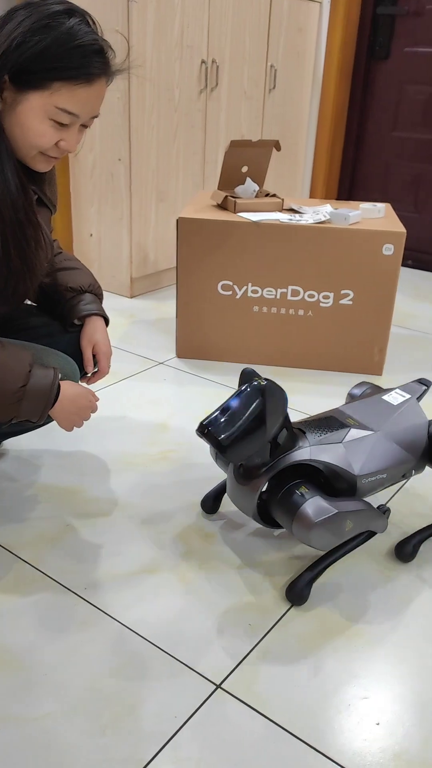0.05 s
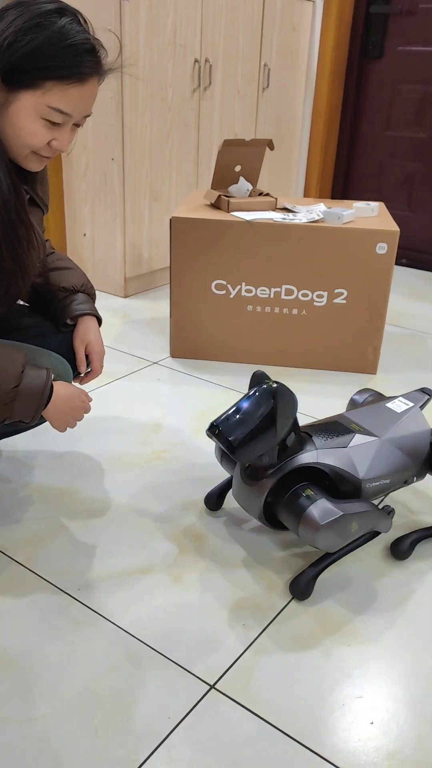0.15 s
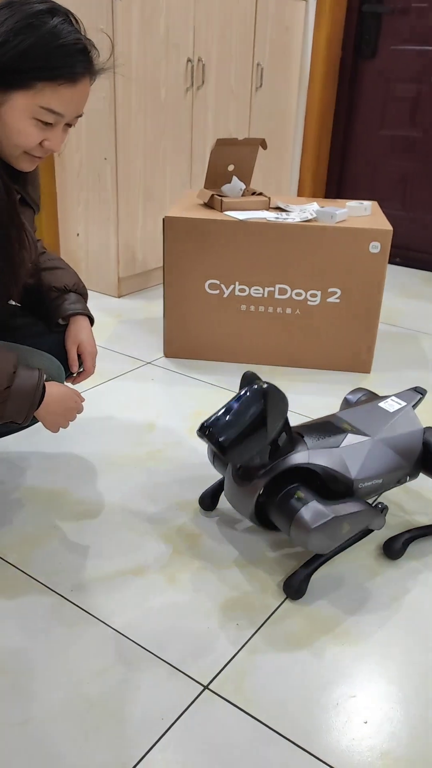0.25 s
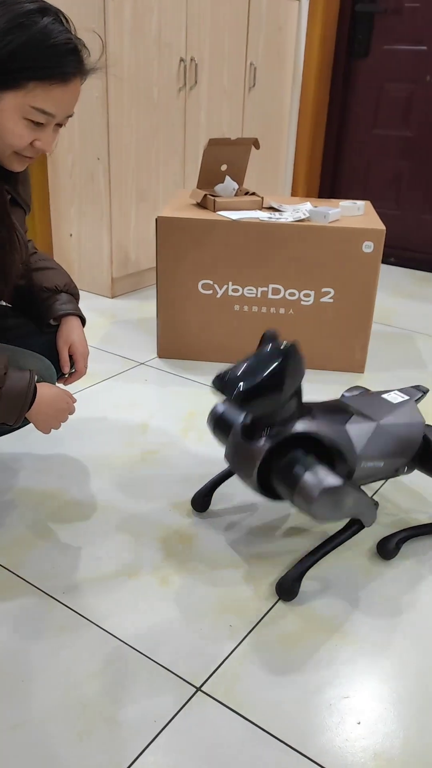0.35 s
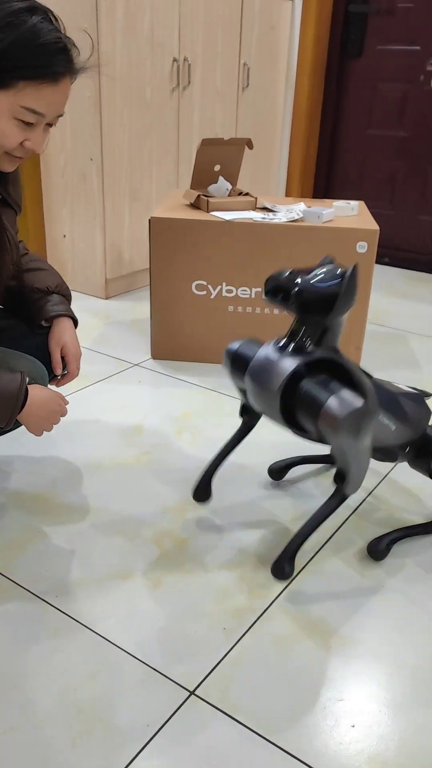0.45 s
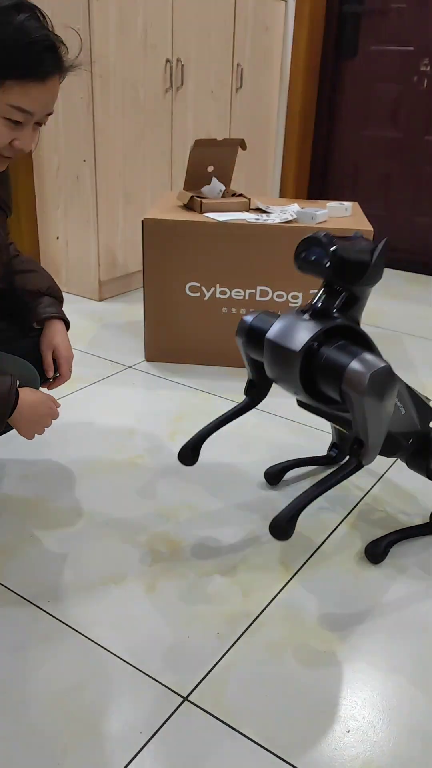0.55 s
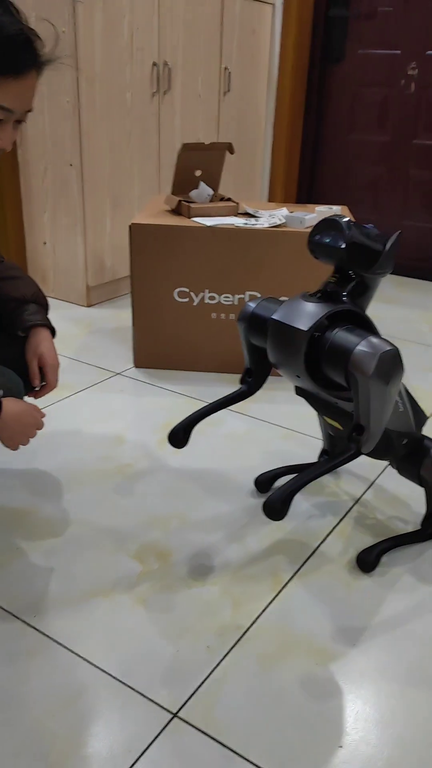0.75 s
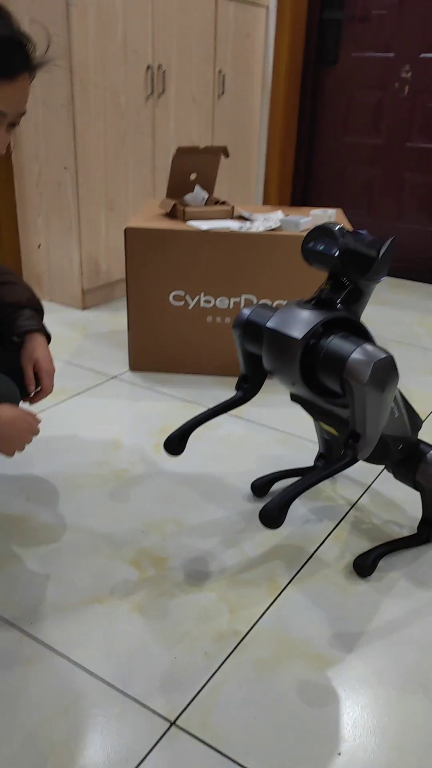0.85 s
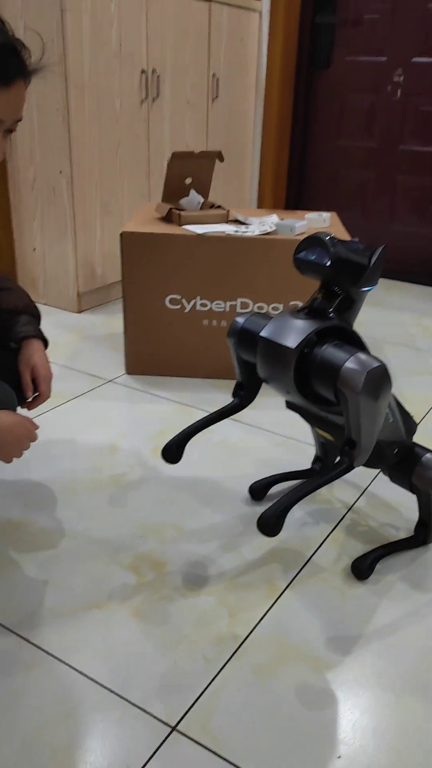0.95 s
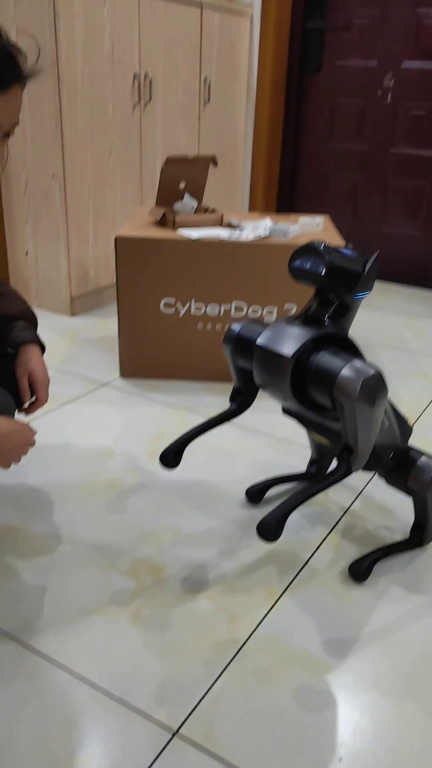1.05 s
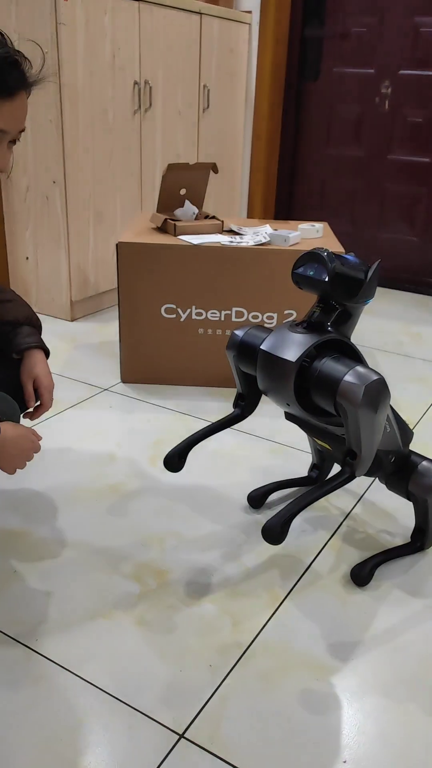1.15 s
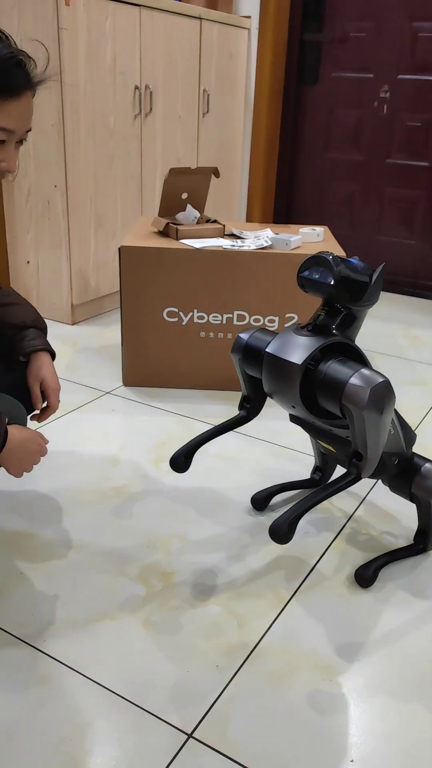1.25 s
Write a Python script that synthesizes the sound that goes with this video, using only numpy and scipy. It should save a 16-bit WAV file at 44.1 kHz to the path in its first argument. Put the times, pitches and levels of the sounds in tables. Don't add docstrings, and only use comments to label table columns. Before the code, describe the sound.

A small robot on four legs jerks up from a tiled floor with a loud thud and plastic clack, rattles, then whirrs briefly into a softer second knock, in a hard-walled room, phone about two metres away.

```python
import sys
import numpy as np
from scipy import signal
from scipy.io import wavfile
from scipy.ndimage import uniform_filter1d

SR = 44100
rng = np.random.default_rng(int(sys.argv[2]) if len(sys.argv) > 2 else 0)


def dump(signal):
    limited = np.clip(np.atleast_2d(signal).T, -1, 1)
    pcm = np.round(limited * 32767).astype(np.int16)
    wavfile.write(sys.argv[1], SR, pcm)


def convert_level_to_amplitude(level_db):
    exponent = np.asarray(level_db, float) / 20
    return 10 ** exponent


N = 57330
T = np.arange(N) / SR
CARRIER_HZ = 11950
WIDE_HZ = 753


def unit(x):
    return x / np.sqrt(np.mean(x ** 2))


def curve(rows, column=1):
    rows = np.array(rows, float)
    return np.interp(T, rows[:, 0], rows[:, column])


def band(x, hz, width):
    return signal.lfilter(*signal.iirpeak(min(hz, .45 * SR), hz / width, SR), x)


def ring(x, hz, t60):
    radius = np.exp(-np.log(1000) / (t60 * SR))
    angle = 2 * np.pi * hz / SR
    return signal.lfilter([0, np.sin(angle)], [1, -2 * radius * np.cos(angle), radius ** 2], x)


def butter(x, order, hz, kind):
    return signal.lfilter(*signal.butter(order, hz, kind, fs=SR), x)


def walk(rate):
    k = int(SR / rate)
    return unit(uniform_filter1d(uniform_filter1d(rng.standard_normal(N), k), k))


def thuds():
    # (time [s], level [dB], ring [Hz], t60 [s])
    landings = [(.243, -14, 890, 0.022), (.25, -29.5, 285, 0.095), (.261, -5.5, 383, 0.041),
                (0.2773, -15, 255.2, 0.12), (0.282, -16.5, 464, .08), (0.2951, -12.5, 250.3, 0.088),
                (0.2994, -15.5, 414, 0.072), (0.303, -25, 270, 0.035), (0.306, -29, 127, 0.19),
                (0.32, -27, 290, 0.3), (0.353, -22.5, 222, 0.033), (0.399, -28.5, 370, 0.078),
                (0.512, -41, 290, 0.3), (.564, -19.5, 746, 0.036), (0.573, -20, 360, 0.11),
                (.584, -26, 290, 0.096), (.594, -20, 357, .05), (.59, -30, 208, 0.23),
                (0.566, -23, 159, 0.092), (.64, -43.5, 168.7, 0.19), (0.657, -45.5, 316, 0.11),
                (.72, -50, 208, 0.048), (0.9767, -37, 1600, 0.011), (.977, -43.5, 388.4, 0.11),
                (0.986, -38, 227, 0.1), (0.995, -39, 301, 0.06), (1.014, -36.5, 222, 0.028),
                (1.039, -41, 358.6, 0.13), (1.062, -37, 220.5, 0.053), (1.086, -50, 360, 0.071)]
    out = np.zeros(N)
    for start, db, hz, t60 in landings:
        age = np.maximum(T - start, 0)
        onset = 1 - np.exp(-age * hz / .4)
        out += convert_level_to_amplitude(db - 60 * age / t60) * onset * np.sin(2 * np.pi * hz * age)
    return butter(out, 2, 110, "high")


def slab_boom():
    # (time [s], level [dB])
    blows = [
        (0.249, -27),
        (.55, -47),
        (0.699, -59),
        (.92, -70),
    ]
    slab_hz, t60_s, rise_s = 59.8, 1.08, 0.058
    level = 0
    for start, db in blows:
        age = np.maximum(T - start, 0)
        level = level + convert_level_to_amplitude(db - 60 * age / t60_s) * (1 - np.exp(-(age / rise_s) ** 2))
    wobble = convert_level_to_amplitude(2.2 * walk(18))
    return level * wobble * np.sin(2 * np.pi * slab_hz * T + walk(2.2))


def clacks():
    # (time [s], level [dB], contact [ms])
    stops = [
        (0.243, -24.5, 0.029),
        (.245, -15, 0.058),
        (.26, -23.5, 0.034),
        (.27, -26.5, 0.04),
        (.297, -31, 0.11),
        (.321, -19, 0.386),
        (.478, -51, 0.07),
        (.566, -64, .04),
        (.976, -51, 0.13),
    ]
    push = np.zeros(N)
    for start, db, ms in stops:
        push += convert_level_to_amplitude(db) * np.exp(-.5 * ((T - start) * 1000 / (0.18 * ms)) ** 2) * 0.031 / ms
    return push


def rattle():
    # (time [s], level [dB])
    chatter_level = [(.222, -86), (.239, -39), (.243, -19.5), (.28, -27), (.34, -36), (.42, -50),
                     (.54, -51), (.562, -38), (.59, -36.5), (.63, -45.5), (.7, -67), (.97, -77.5),
                     (.98, -57), (1.06, -69), (1.13, -67.5)]
    ticks_per_s, spread_db = 4000, 2.5
    happens = rng.random(N) < ticks_per_s / SR
    strength = convert_level_to_amplitude(spread_db * rng.exponential(size=N))
    ticks = happens * strength * rng.choice([-1, 1], N)
    return 0.16 * unit(ticks) * convert_level_to_amplitude(curve(chatter_level))


def shell(push, chatter):
    # (frequency [Hz], level [dB], t60 [s])
    shell_modes = [(691, -14.5, 0.037), (846, -6.5, 0.012), (1380, -11, 0.005), (1600, -6, 0.019),
                   (1840, -10.5, 0.011), (2243, -8, 0.014), (2402, -7, 0.02), (2618, -5, 0.016),
                   (3020, -8.5, 0.0091), (3720, -2, 0.0042), (4520, -3, 0.003), (5280, -4.5, 0.0028),
                   (6500, -10, 0.0013), (10650, -2, 0.00099)]
    # (time [s], treble crack [dB])
    hardness_curve = [
        (.22, 0),
        (.33, 0),
        (.4, -12),
        (.45, -20),
        (.54, -10),
        (.562, 5),
        (.585, -4),
        (.62, -10),
        (.66, -20),
        (1.3, -24),
    ]
    hardness = curve(hardness_curve)
    crack = convert_level_to_amplitude(-5) * butter(push + chatter * convert_level_to_amplitude(hardness), 2, 5000, "high")
    contact = butter(push + chatter, 2, [400, 7500], "band")
    firm = contact * convert_level_to_amplitude(.5 * hardness)
    modes = np.array([convert_level_to_amplitude(db) * ring(contact if hz < 4300 else firm, hz, t60)
                      for hz, db, t60 in shell_modes])
    sign = (-1.) ** np.arange(len(shell_modes))
    return modes.sum(0) + crack, convert_level_to_amplitude(2.0) * sign @ modes + convert_level_to_amplitude(-4) * np.roll(crack, 9)


def chassis(chatter):
    # (frequency [Hz], level [dB], t60 [s])
    chassis_modes = [(207.8, -4, 0.054), (290, 0, 0.11), (360, 4, .05), (453, -3, 0.099)]
    drum = sum(convert_level_to_amplitude(db) * ring(band(chatter, hz, hz), hz, t60) for hz, db, t60 in chassis_modes)
    return convert_level_to_amplitude(-10) * drum


def gears(speed):
    # (frequency [Hz], width [Hz], level [dB], power of speed [-])
    housing = [(1600, 310, 0.5, 1.5), (2030, 310, -2, 0), (2853, 310, 5.5, 4), (3500, 600, -3.5, 1.5),
               (5370, 1100, -12, 0), (8500, 560, -28.5, 0.5)]
    grit = rng.standard_normal(N) * convert_level_to_amplitude(2.2 * walk(400))
    out = 0
    for hz, width, db, power in housing:
        whirr = band(band(band(grit, hz, width), hz, 2 * width), hz, 3 * width)
        out = out + convert_level_to_amplitude(db) * (speed / 377.0) ** power * unit(whirr)
    return out


def whistle(speed):
    # (multiple of speed [-], level [dB])
    sidebands = [(-3, 2), (-1, -1), (1, -2.5), (3, -2.5), (5, -9.5)]
    jitter_rad = 2.3
    turn = 2 * np.pi * np.cumsum(speed) / SR
    out = 0
    for multiple, db in sidebands:
        phase = 2 * np.pi * CARRIER_HZ * T + multiple * turn + jitter_rad * walk(150)
        out = out + convert_level_to_amplitude(db + 2.3 * walk(113.4)) * np.sin(phase)
    return convert_level_to_amplitude(-12.5) * out


def holding_tone():
    # (time [s], level [dB])
    hold_level = [(0, -83), (.2, -88), (.7, -90), (.85, -85), (.93, -97), (1.05, -97), (1.1, -77),
                  (1.3, -80)]
    return convert_level_to_amplitude(curve(hold_level) + 1.2 * walk(15)) * np.sin(2 * np.pi * (CARRIER_HZ + 5) * T)


def motors():
    # (time [s], electrical speed [Hz], effort [dB])
    run = [
        (.33, 11, -77),
        (.39, 30, -60),
        (.44, 90, -56),
        (.48, 170, -40),
        (.52, 288, -40.5),
        (.553, 343, -37.5),
        (.56, 370, -39.5),
        (.6, 240, -57),
        (.66, 250, -83.5),
    ]
    speed, effort = curve(run), convert_level_to_amplitude(curve(run, column=2))
    hold = holding_tone()
    mid = effort * (gears(speed) + whistle(speed)) + hold
    side = effort * whistle(speed) + 0.62 * hold
    return mid, side


def room(x):
    t60_s, treble_t60_s = 0.31, 0.14
    t = np.arange(SR) / SR
    noise = rng.standard_normal((2, SR)) * np.clip((t - .004) / 0.0043, 0, 1)
    low = butter(noise, 1, 2500, "low")
    tail = low * convert_level_to_amplitude(-60 * t / t60_s) + (noise - low) * convert_level_to_amplitude(-60 * t / treble_t60_s)
    tail = tail / np.sqrt(np.sum(tail[0] ** 2))
    mid, side = signal.fftconvolve(tail, x[None], axes=1)[:, :N]
    return mid, butter(side, 1, WIDE_HZ, "high")


def wide_noise(hz, width):
    shared = band(rng.standard_normal(N), hz, width)
    apart = band(rng.standard_normal(N), hz, width) * np.array([[1], [-1]])
    return shared + min(hz / WIDE_HZ, 1) * apart


def cooling_fan():
    # (frequency [Hz], width [Hz], level [dB])
    resonances = [(120.5, 10.8, 6.5), (285, 22, 6), (370, 31, 2.5), (773, 30, 2.5), (1430, 79, -31),
                  (2430, 100, -11.5), (5560, 320, -20), (10600, 1100, -34)]
    out = 0
    for hz, width, db in resonances:
        out = out + convert_level_to_amplitude(db + 2 * walk(10)) * band(wide_noise(hz, width + 30), hz, 3 * width + 90)
    return convert_level_to_amplitude(-58) * unit(out)


def room_tone():
    # (frequency [Hz], level [dB])
    spectrum = [(30, 14.5), (60, 7.5), (350, 1), (900, -10.5), (2500, -9), (5800, -23), (8000, -40),
                (12000, -34.5)]
    hz_points, db_points = np.array(spectrum).T
    out = 0
    for hz in 35 * 2 ** np.arange(0, 9, .5):
        db = np.interp(np.log(hz), np.log(hz_points), db_points) + 1.7 * walk(8)
        out = out + convert_level_to_amplitude(db) * band(wide_noise(hz, hz / 1.5), hz, hz / 0.75)
    soft = signal.sosfilt(signal.butter(8, 4960, fs=SR, output="sos"), out)
    hiss = convert_level_to_amplitude(-85) * rng.standard_normal((2, N))
    return convert_level_to_amplitude(-57) * unit(soft + convert_level_to_amplitude(-27.5) * out) + hiss


def scene():
    limbs, slab = thuds(), slab_boom()
    push, chatter = clacks(), rattle()
    shell_mid, shell_side = shell(push, chatter)
    body = shell_mid + chassis(chatter)
    drive, whine = motors()
    wet_mid, wet_side = convert_level_to_amplitude(-11) * np.array(room(convert_level_to_amplitude(-1.5) * limbs + body + drive))
    mid = limbs + slab + body + drive + wet_mid
    side = shell_side + whine + convert_level_to_amplitude(4) * wet_side - 0.24 * (limbs + slab)
    port_gain = convert_level_to_amplitude(np.array([[1.25], [-1.25]]))
    return np.array([mid + side, mid - side]) * port_gain + cooling_fan() + room_tone()


def low_pass(x):
    return signal.sosfilt(signal.butter(12, 16690, fs=SR, output="sos"), x)


def record(dry):
    top_cut = signal.ellip(8, .2, 70, 16100, fs=SR, output="sos")
    return low_pass(signal.sosfilt(top_cut, dry))


dry = scene()
out = record(dry)
dump(out)
```